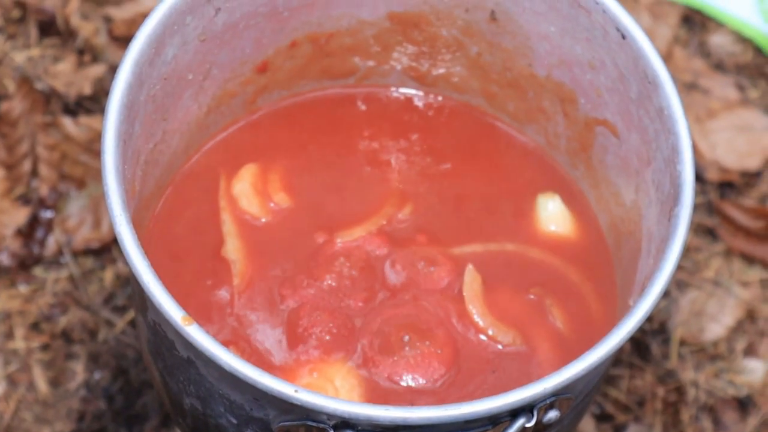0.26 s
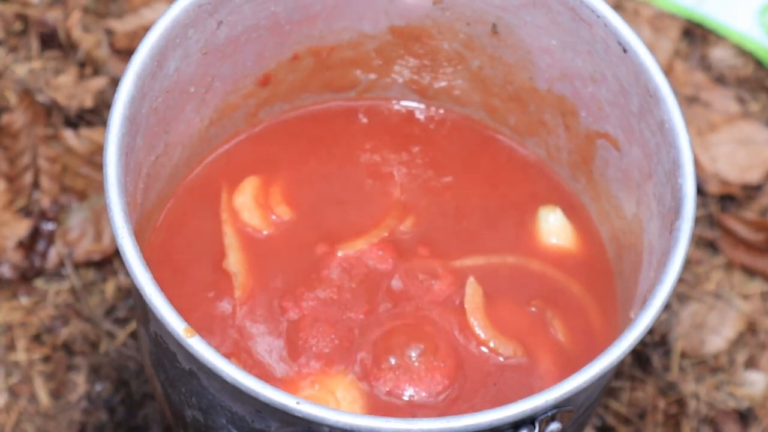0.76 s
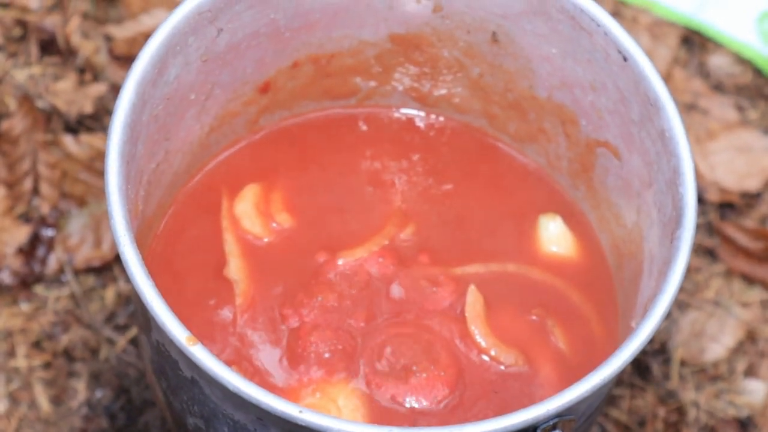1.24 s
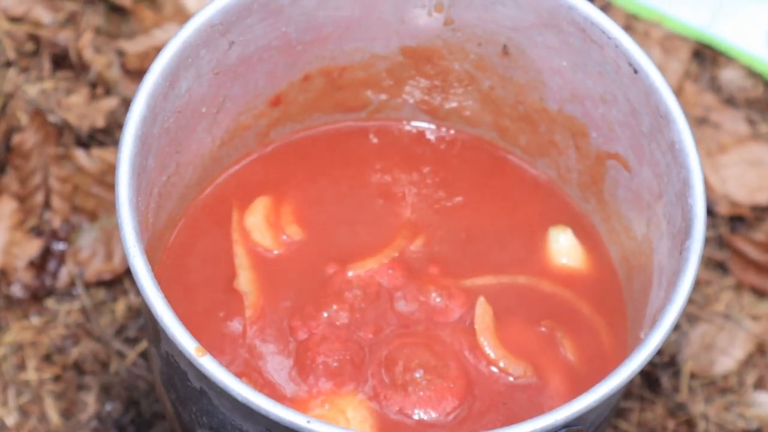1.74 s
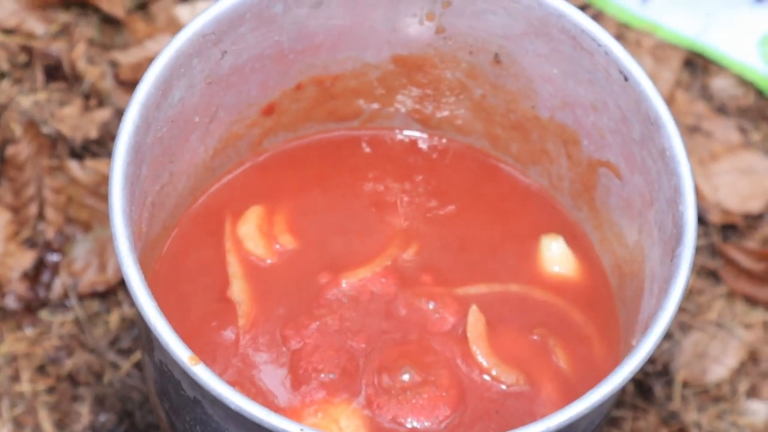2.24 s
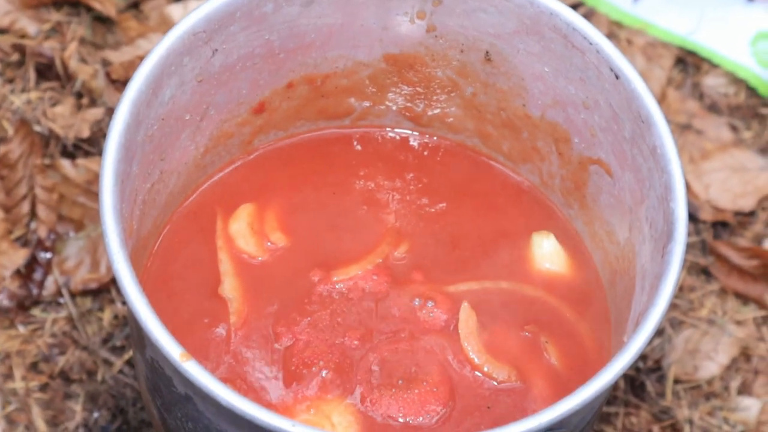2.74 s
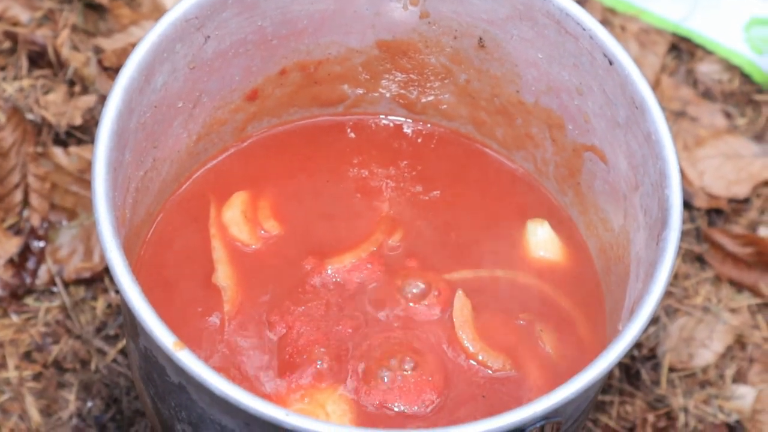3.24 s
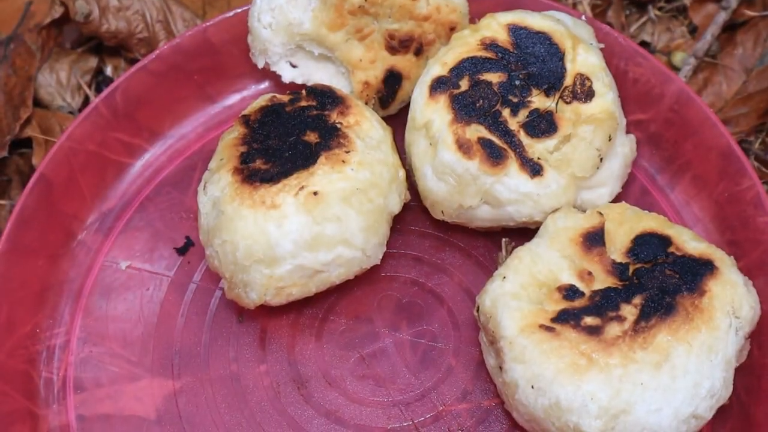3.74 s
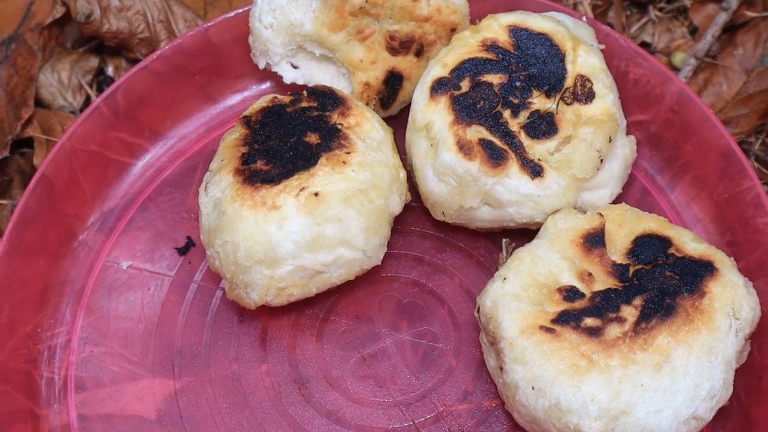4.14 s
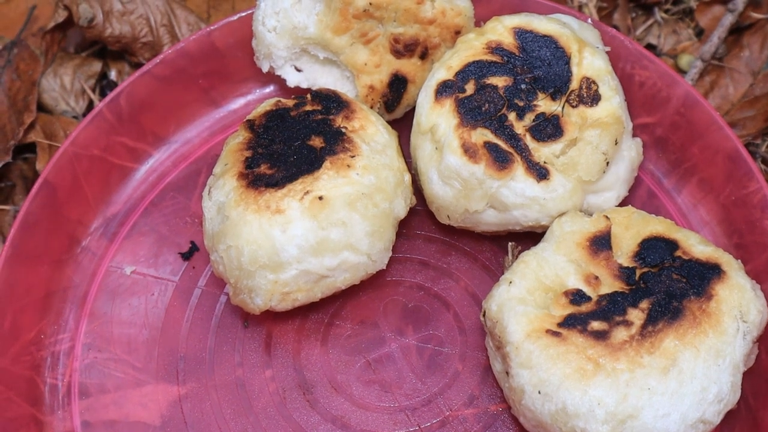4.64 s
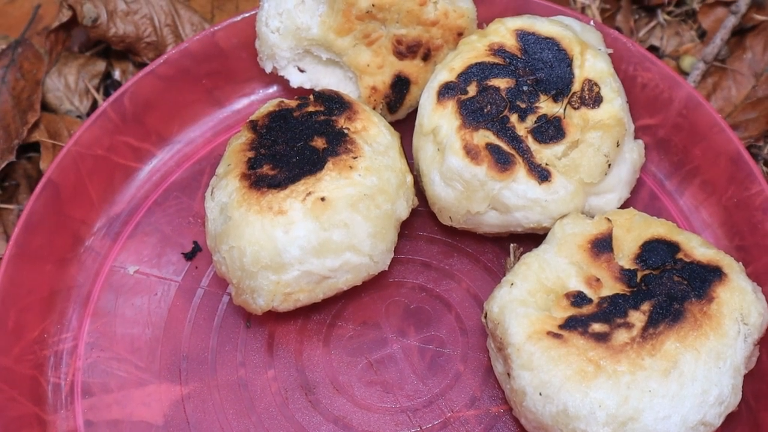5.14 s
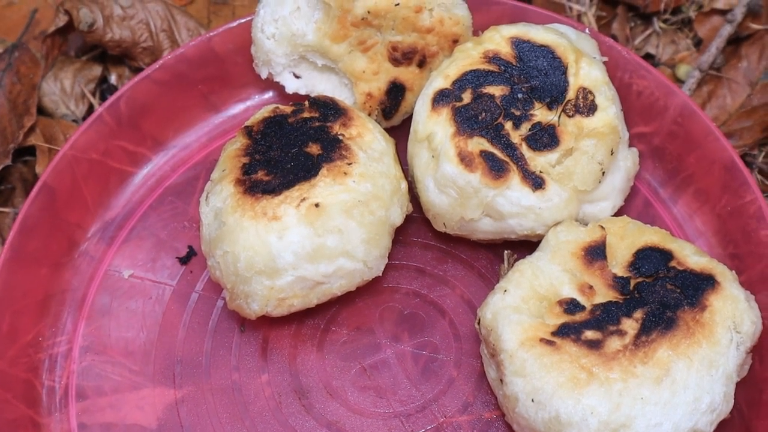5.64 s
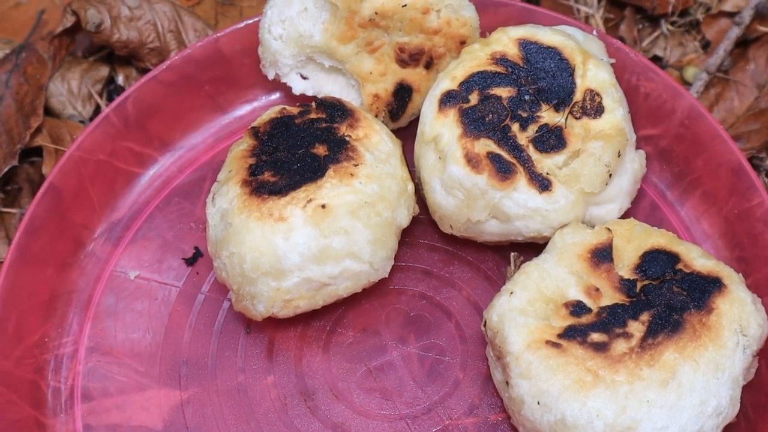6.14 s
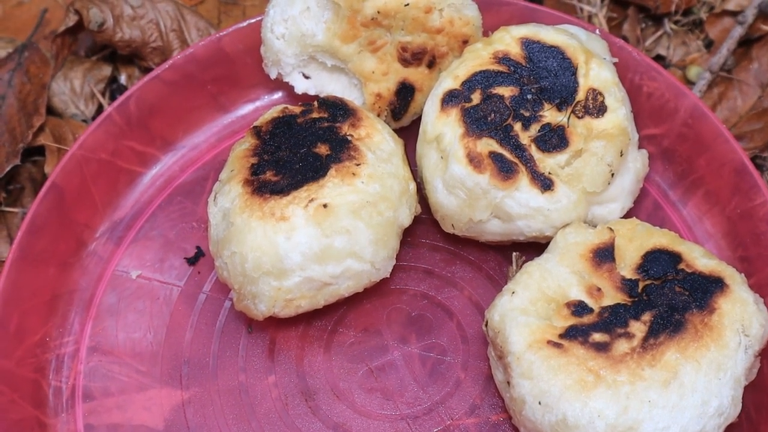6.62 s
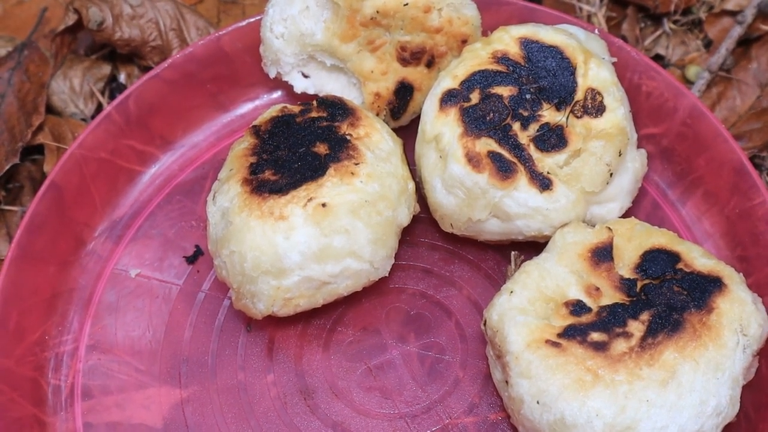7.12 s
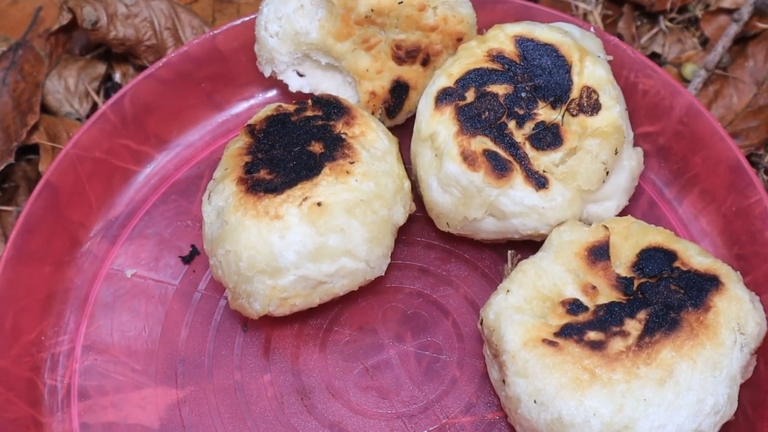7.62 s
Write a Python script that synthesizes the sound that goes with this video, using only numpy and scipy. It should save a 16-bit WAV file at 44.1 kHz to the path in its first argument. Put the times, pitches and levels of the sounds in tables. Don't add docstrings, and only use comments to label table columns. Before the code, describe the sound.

A small stove flame roars gently under a simmering pot in the open, miked near and dry, without echo. Gas hiss fills the upper range, trembling with the flame, droplets sputtering finely on hot metal. After about three seconds the tone shifts, slightly weaker in the low end, with edgy spitting surges. A few dull flame pops and sauce-bubble clicks stand out. A very short dropout precedes the final fragment.

```python
import sys
import numpy as np
from scipy import signal
from scipy.fft import rfft, irfft, next_fast_len
from scipy.io import wavfile
from scipy.ndimage import uniform_filter1d, map_coordinates

SR = 44100
rng = np.random.default_rng(int(sys.argv[2]) if len(sys.argv) > 2 else 0)


def digitize_waveform(pressure):
    field = np.atleast_2d(pressure).T
    bounded = np.clip(field, -1, 1)
    quanta = np.round(bounded * 32767).astype(np.int16)
    wavfile.write(sys.argv[1], SR, quanta)


def rack_gain(trim_db):
    fader = np.asarray(trim_db, float)
    return 10 ** (fader / 20)


N = 347067
TIME = np.arange(N) / SR


def unit(x):
    return x / np.sqrt(np.mean(x ** 2) + 1e-20)


def wobble(rate_hz):
    knots = rng.standard_normal(int(N * rate_hz / SR) + 4)
    return map_coordinates(knots, [TIME * rate_hz])


def curve(rows):
    return np.interp(TIME, *np.transpose(rows))


def swells(rows):
    return sum(db * np.exp(-((TIME - t_s) / half_s) ** 2) for t_s, db, half_s in rows)


def sloped(points):
    f_hz, level_db = np.transpose(points)
    return lambda hz: rack_gain(np.interp(np.log(hz + 1), np.log(f_hz), level_db, -120, -120))


def resonant(modes, steep):
    def gain(hz):
        power = sum(rack_gain(2 * db) / (1 + (2 * (hz - f_hz) / width_hz) ** 2) ** steep
                    for f_hz, width_hz, db in modes)
        return np.sqrt(power)
    return gain


def coloured(x, gain):
    m = next_fast_len(N + 8192)
    spectrum = rfft(x, m) * gain(np.fft.rfftfreq(m, 1 / SR))
    return unit(irfft(spectrum, m)[:N])


def patchy(x, depth_db):
    z = signal.stft(x, nperseg=512)[2]
    field = uniform_filter1d(rng.standard_normal(z.shape), 8, 0)
    field = uniform_filter1d(field, 10, 1)
    return signal.istft(z * rack_gain(depth_db * unit(field)), nperseg=512)[1][:N]


# start t/s, end t/s
PLACE_SPANS = [
    (0, 3.312),
    (3.312, 7.79),
    (7.79, 7.87),
]
# roar, low jet, high jet, edge jet, whistle, air, side gap [all level/dB]
LAYER_LEVELS = [
    (-24.5, -44.5, -44.5, -57.5, -64, -53.5, -49.5),
    (-27.5, -46, -45, -60.5, -65.5, -57.5, -47.5),
    (-31.5, -47, -46, -58, -64, -55, -62),
]


def heard(x, gains, layer):
    out = np.zeros(N)
    for (start_s, end_s), gain, levels_db in zip(PLACE_SPANS, gains, LAYER_LEVELS):
        here = (TIME >= start_s) & (TIME < end_s)
        out += here * rack_gain(levels_db[layer]) * coloured(x, gain)
    return out


def ignitions(rate_hz, spread_db):
    lit = rng.random(N) < rate_hz / SR
    return unit(lit * rack_gain(spread_db * rng.standard_normal(N)))


# t/s, level over usual kicks/dB
BACKFIRE_KICKS = [
    (1.0576, 24),
    (1.0628, 26.5),
    (5.2402, 26),
]


def flame_kicks():
    kicks = ignitions(rate_hz=6000, spread_db=2.5)
    for t_s, db in BACKFIRE_KICKS:
        kicks[round(t_s * SR)] += rack_gain(db)
    return kicks


# f/Hz, level/dB per Hz
ROAR_SPECTRA = [
    [(12, -47), (20, -19), (49, -24.5), (217, -2.5), (368, -2), (470, -9), (520, -10.5), (625, -14.5),
     (706, -12), (782, -17.5), (920, -10), (1250, -10.5), (1730, -21), (1920, -21), (2600, -39.5),
     (3380, -54), (5720, -120)],
    [(12, -47), (20, -19), (80, -19.5), (130, -8.5), (212, -5.5), (250, -3), (332, -2.5), (424, -7),
     (576, -8), (798, -20.5), (1040, -12.5), (1350, -11), (1730, -17.5), (1940, -17), (2350, -31.5),
     (3380, -53), (5720, -120)],
    [(35, -51), (60, -20), (295, 1.5), (546, -13), (713, -14), (849, -17), (1620, -12), (2600, -51),
     (3380, -75), (5720, -120)],
]


def roar(kicks, flicker, gas_db):
    drive = kicks + .4 * rng.standard_normal(N)
    drive = heard(drive, [sloped(points) for points in ROAR_SPECTRA], layer=0)
    return rack_gain(0.43 * flicker + 0.85 * gas_db) * drive


def spatter(rate_hz, spread_db, t60_s):
    decay = rack_gain(-60 * TIME[:SR // 20] / t60_s)
    puffs = np.convolve(ignitions(rate_hz, spread_db), decay)[:N]
    return unit(puffs * rng.standard_normal(N))


# f/Hz, width/Hz, level/dB
LOW_JET_MODES = [
    [(2550, 290, -2), (2900, 320, -2.5), (3410, 450, 2), (4210, 200, -2.5), (4970, 190, -5)],
    [(2800, 390, -2), (3030, 250, -5.5), (3770, 240, -10), (4390, 280, -11.5), (4900, 470, -11)],
    [(3120, 950, 3), (4300, 500, -7)],
]
# f/Hz, width/Hz, level/dB
HIGH_JET_MODES = [
    [(5580, 300, -5), (5910, 370, -1.5), (6350, 130, -13), (6700, 300, -1.5), (6920, 340, -1),
     (7390, 280, -1), (7800, 300, -3.5)],
    [(5700, 470, -5.5), (6570, 710, -2), (6970, 430, -2.5), (7410, 650, 0.5)],
    [(5800, 620, 0), (7000, 700, 4)],
]
# f/Hz, width/Hz, level/dB
EDGE_JET_MODES = [
    [(8250, 200, -3), (8640, 400, 2)],
    [(8170, 590, 1), (8550, 600, -1), (9360, 700, -3.5), (10900, 500, -19)],
    [(8500, 900, 0)],
]


def jet(kicks, drops, flicker, gas_db, surge_db):
    low = patchy(0.49 * kicks + 0.31 * drops + rng.standard_normal(N), depth_db=0.64)
    low = heard(low, [resonant(modes, steep=1.3) for modes in LOW_JET_MODES], layer=1)
    low *= rack_gain(0.45 * flicker + 0.93 * gas_db + .1 * surge_db)

    treble = patchy(.25 * kicks + 0.19 * drops + rng.standard_normal(N), depth_db=0.73)
    high = heard(treble, [resonant(modes, steep=1.51) for modes in HIGH_JET_MODES], layer=2)
    high *= rack_gain(.85 * flicker + .15 * gas_db + 0.21 * surge_db)
    edge = heard(treble, [resonant(modes, steep=1.8) for modes in EDGE_JET_MODES], layer=3)
    edge *= rack_gain(0.59 * flicker + .3 * gas_db + surge_db - 5.5)
    return low + high + edge


# f/Hz, width/Hz, level/dB
SIDE_GAP_MODES = [
    [(5800, 300, 3), (7630, 280, -6), (4150, 250, -8)],
    [(4700, 440, -3), (5760, 320, -3.5), (6660, 400, 2), (9000, 500, -7.5)],
    [(5800, 500, 0)],
]
# t/s, level/dB
GAP_FACING = [
    (0, 0.5),
    (1.5, -5),
    (2.3, -9),
    (5.8, -12),
    (6.3, -6),
    (6.7, -8),
    (7.0, 2),
    (7.75, 0),
]


def side_gap(drops, flicker):
    hiss = patchy(.2 * drops + rng.standard_normal(N), depth_db=3.0)
    hiss = heard(hiss, [resonant(modes, steep=1.6) for modes in SIDE_GAP_MODES], layer=6)
    return rack_gain(.85 * flicker + curve(GAP_FACING)) * hiss


# f/Hz, width/Hz, level/dB
WHISTLE_MODES = [
    [(13830, 350, 5), (14700, 300, -9)],
    [(13000, 700, -10), (13780, 450, 0)],
    [(13800, 700, 0)],
]
# t/s, swell level/dB, half length/s
VALVE_SWELLS = [(0, 5, .1), (.33, -4, .15), (.77, 4, .09), (1.43, -3, .05), (2.15, 3, .2), (2.9, 2.5, .2),
                (3.9, 4, .09), (4.08, -5, .04), (4.27, 3, .09), (4.52, -3, .09), (5.1, -5, .09),
                (6.2, 8, .15), (6.55, 5, .12), (6.95, 9, .08), (7.1, -4, .05), (7.35, 5, .12),
                (7.66, 7, .07)]


def valve(flicker):
    whistle = patchy(rng.standard_normal(N), depth_db=1.1)
    whistle = heard(whistle, [resonant(modes, steep=1.5) for modes in WHISTLE_MODES], layer=4)
    return rack_gain(.9 * flicker + swells(VALVE_SWELLS)) * whistle


# f/Hz, level/dB per Hz
AIR_SPECTRUM = [(2000, -42), (4000, 3), (9500, -5), (12200, -4), (13200, -3), (14400, -5), (15800, -6)]


def air(drops, flicker, gas_db, surge_db):
    hiss = patchy(rng.standard_normal(N) + 0.41 * drops, depth_db=1.5)
    hiss = heard(hiss, [sloped(AIR_SPECTRUM)] * len(PLACE_SPANS), layer=5)
    return rack_gain(.9 * flicker + .8 * gas_db + .1 * surge_db) * hiss


# t/s, peak level/dB, f/Hz, t60/s
BUBBLE_POPS = [
    (2.1795, -21, 2600, .009),
    (2.1806, -30, 3200, .006),
    (2.184, -19, 2900, .007),
    (7.7425, -30, 3200, .008),
    (7.763, -16, 3100, 0.0088),
    (7.8305, -30, 3100, .006),
    (7.8340, -33, 3500, .006),
]


def sauce():
    out = np.zeros(N + SR)
    t = np.arange(SR // 20) / SR
    onset = 1 - np.exp(-t / .0003)
    for t_s, db, f_hz, t60_s in BUBBLE_POPS:
        ring = rack_gain(db - 60 * t / t60_s) * onset * np.sin(2 * np.pi * f_hz * t)
        out[round(t_s * SR):][:len(t)] += ring
    return out[:N]


# t/s, level/dB
GAS_FLOW = [(0, 1.5), (.4, 0), (1.35, 0.5), (2.1, -0.5), (2.8, -0.5), (3.02, 2), (3.25, 1.5), (3.36, -1.5),
            (3.82, 0.5), (4.55, -1.1), (4.7, -2.5), (5.1, 0.2), (5.75, 0), (5.85, -0.5), (6.4, 1.3),
            (6.95, 1), (7.12, 0.2), (7.7, 0.8)]
# t/s, swell level/dB, half length/s
EDGE_SURGES = [(0, 5, .1), (1.35, 7, 0.049), (2.06, -1, .08), (3.0, 4, .1), (3.36, 8, .05), (3.7, 6, 0.14),
               (3.9, 9, 0.21), (4.33, 12, 0.052), (4.82, 6, 0.088), (5.12, 4, 0.075), (5.35, 10, 0.056),
               (5.68, 0, 0.049), (6.05, 6, 0.17), (6.38, 10.5, 0.13), (6.62, 4, .09), (7.0, 10, 0.12),
               (7.25, 9.5, 0.16), (7.7, 9, 0.13)]


def scene():
    kicks = flame_kicks()
    flicker = .6 * wobble(7) + .7 * wobble(18) + .7 * wobble(60)
    gas_db = curve(GAS_FLOW)
    surge_db = swells(EDGE_SURGES)
    drops = spatter(rate_hz=70, spread_db=3.2, t60_s=.012)
    mix = roar(kicks, flicker, gas_db)
    mix += jet(kicks, drops, flicker, gas_db, surge_db)
    mix += side_gap(drops, flicker)
    mix += valve(flicker)
    mix += air(drops, flicker, gas_db, surge_db)
    mix += sauce()
    return mix[None]


def roll_off(x):
    return signal.sosfilt(signal.butter(12, 15740, fs=SR, output="sos"), x)


def record(dry):
    stutter_s, cut_s, mute_s, back_s = 7.7535, 7.7709, 7.7888, 7.8056
    depth_db, recover_s, residue_db = -32, .008, -47
    stutter = rack_gain(depth_db * np.exp(-np.abs(TIME - stutter_s) / recover_s))
    before = [TIME < s for s in (stutter_s, cut_s, mute_s, back_s)]
    gain = np.select(before, [1, stutter, rack_gain(residue_db), 0], 1)
    gain = uniform_filter1d(gain, size=15)
    return roll_off(dry * gain)


dry = scene()
out = record(dry)
digitize_waveform(out)
```